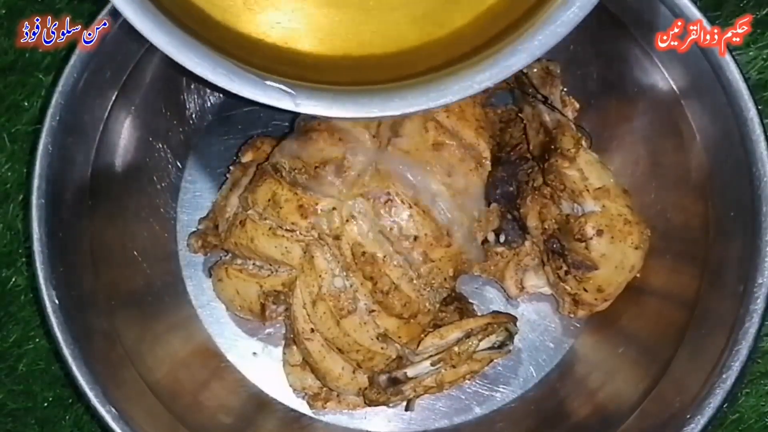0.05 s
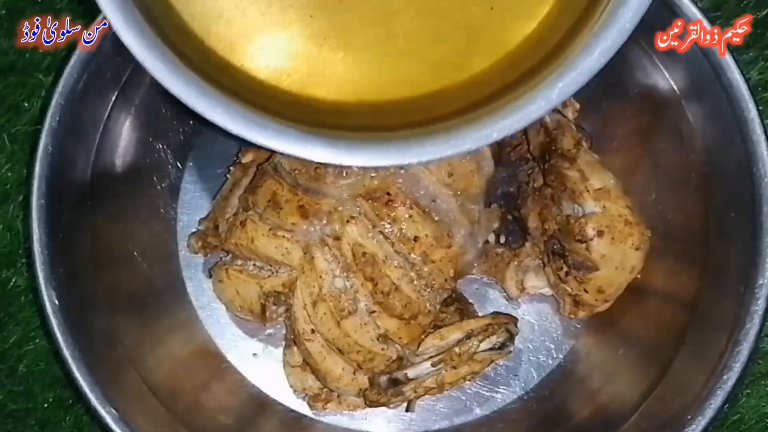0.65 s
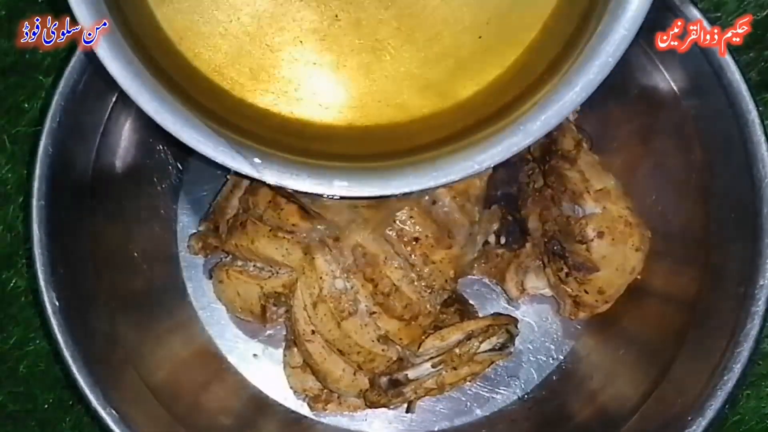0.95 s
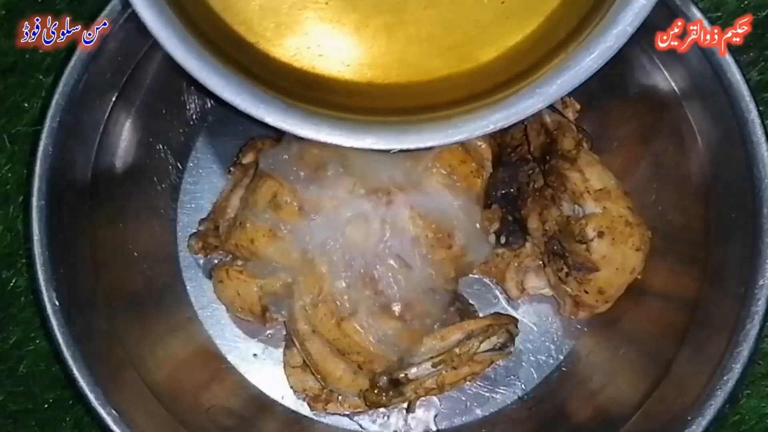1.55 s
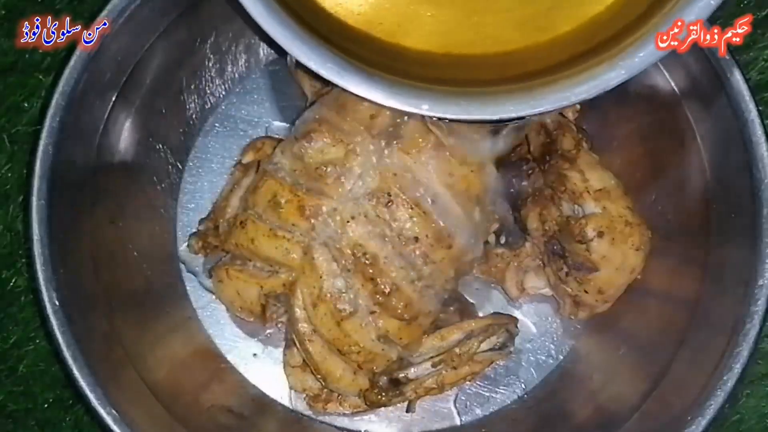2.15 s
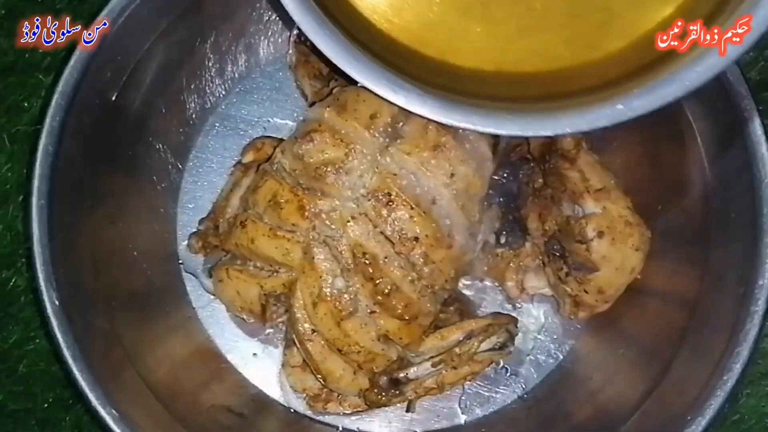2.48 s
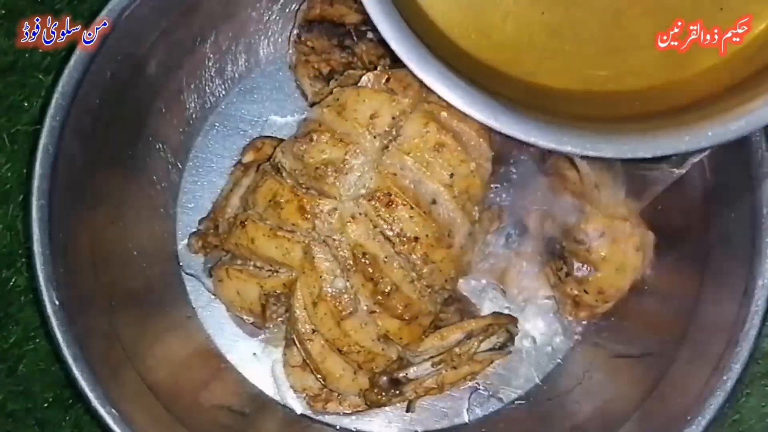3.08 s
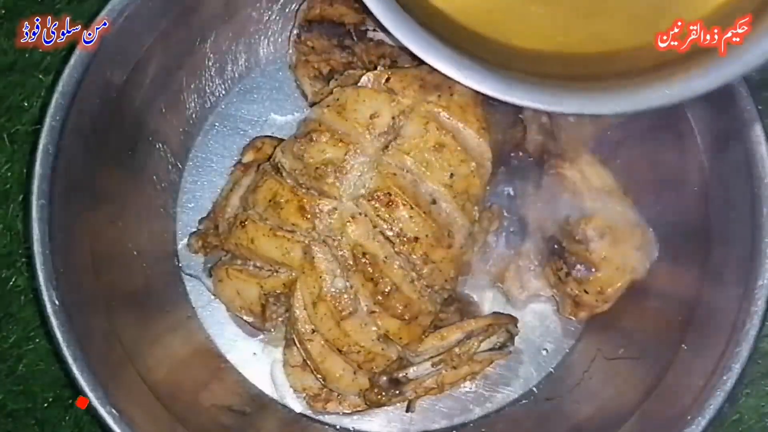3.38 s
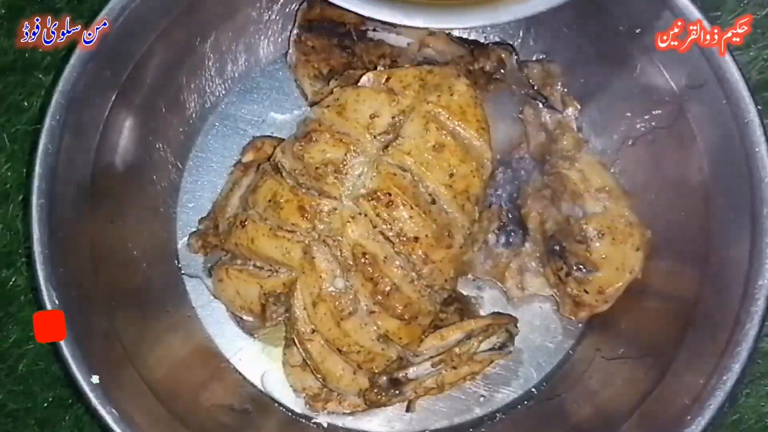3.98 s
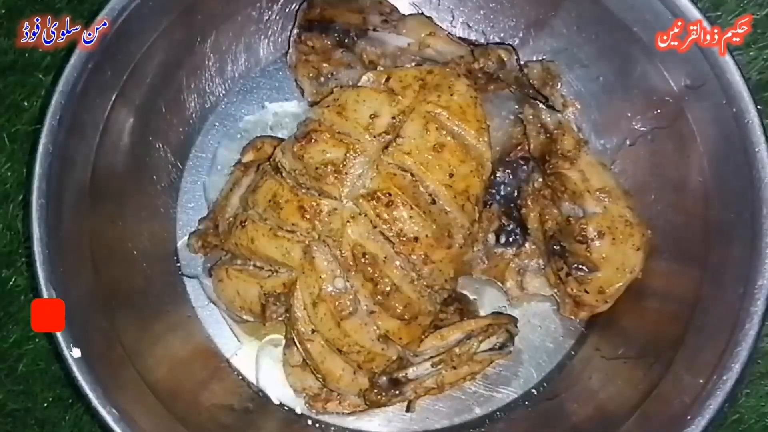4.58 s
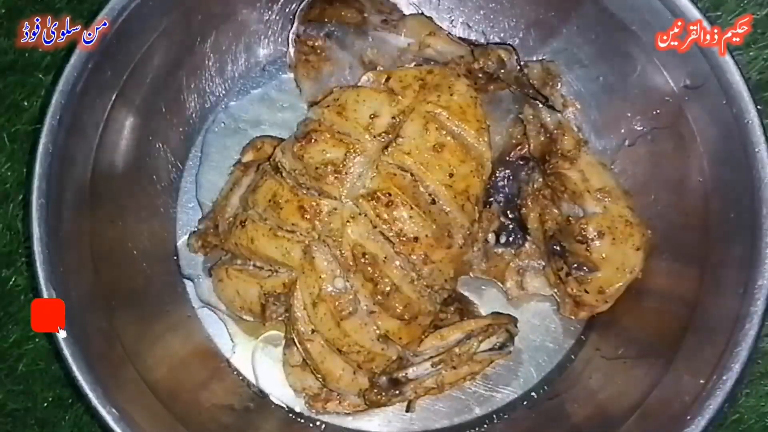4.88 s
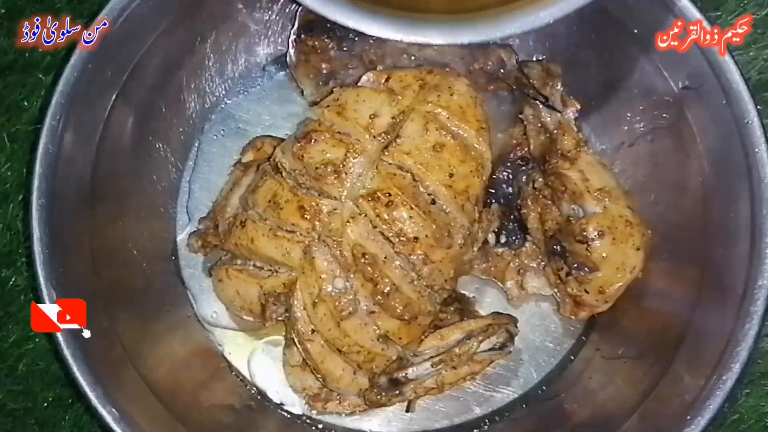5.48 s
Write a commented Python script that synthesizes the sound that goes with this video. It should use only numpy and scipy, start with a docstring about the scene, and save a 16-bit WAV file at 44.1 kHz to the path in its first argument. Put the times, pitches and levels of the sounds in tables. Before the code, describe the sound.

Hot oil sizzles and crackles as it is poured over chicken in a steel bowl, with sharp spits and a faint hum.

```python
"""In a kitchen, hot oil is poured over chicken in a steel bowl, close to a stereo microphone.
Water in the meat boils off as countless bubbles, each a damped oscillator, the larger the lower:
fine fizz, coarser crackle, a flare where oil meets wet skin, and a gurgle as the oil pools.
The bowl resonates and reflects the sizzle, and a faint hum wavers underneath.
Single drops of water spit loudly, and a few big bubbles plop."""
import sys
import numpy as np
from scipy import signal
from scipy.fft import rfft, irfft, next_fast_len
from scipy.io import wavfile
from scipy.ndimage import uniform_filter1d

SR = 44100
rng = np.random.default_rng(int(sys.argv[2]) if len(sys.argv) > 2 else 0)


def persist_wave(psi):
    """Save psi, clipped to +-1, as 16-bit WAV."""
    counts = np.round(np.clip(psi, -1, 1) * 32767).astype(np.int16)
    wavfile.write(sys.argv[1], SR, np.atleast_2d(counts).T)


N = 248283
T = np.arange(N) / SR

# Oil meets wet skin: start t/s, length/s, deep-bubble level/dB, crackle level/dB, ring f/Hz,
# ring level/dB, rate of round trips between the walls f/Hz, share kept per trip before treble loss
FLARES = [(-0.07, 0.24, -45, -39, 1545, -46.5, 770, 0.36), (1.161, 0.24, -39.5, -42, 1700, -43, 797, 0.34),
          (1.57, 0.36, -42, -50.5, 1020, -55.5, 830, 0.077), (3.04, 0.12, -45, -62, 2080, -50, 1080, 0.28),
          (3.996, 0.3, -54, -49, 970, -61, 1020, 0.14), (4.38, 0.3, -46, -42.5, 2190, -47.5, 1120, 0.069),
          (5.335, 0.34, -56, -70, 2404, -49, 1180, 0.13)]


def amp(db):
    """Amplitude ratio of a level: a factor of ten per 20 dB."""
    return 10 ** (np.asarray(db) / 20)


def unit_rms(x):
    """Normalisation: the mean of the two channels gets an rms of 1."""
    return x / np.sqrt(np.mean(x.mean(0) ** 2) + 1e-20)


def over_time(points):
    """Linear interpolation of a table in time."""
    return np.interp(T, *np.transpose(points))


def over_frequency(points, hz):
    """Linear interpolation of a table in log frequency."""
    f, level = np.transpose(points)
    return np.interp(np.log(hz + 1), np.log(f), level)


def pan(left_db):
    """Constant-power panning: two gains from a left-minus-right level difference."""
    pair = amp(np.array([left_db, -left_db]) / 2)
    return pair / np.sqrt(np.mean(pair ** 2, axis=0))


def colour(x, spectrum):
    """Filters in series multiply: source spectrum, bowl resonances, the microphone's unequal sides."""
    air_modes = [(2444, 24, 5), (3387, 31, 5.5), (4695, 120, 2.5)]  # air in the bowl: f/Hz, bandwidth/Hz, lift/dB
    balance = [(30, 6), (100, 2), (450, 5), (700, 5), (1000, 4.5), (1800, 5), (2400, 4), (4400, 6.5),
               (5200, 3.5), (6000, -6), (7000, -18), (7700, -11), (10000, -6), (15000, -8)]  # f/Hz, left-minus-right level/dB
    length = x.shape[1]
    size = next_fast_len(length + SR // 10)
    hz = np.fft.rfftfreq(size, 1 / SR)
    bowl = 1 + sum((amp(db) - 1) / (1 + 2j * (hz - f) / width) for f, width, db in air_modes)
    gain = pan(over_frequency(balance, hz)) * amp(over_frequency(spectrum, hz)) * bowl
    return irfft(rfft(x, size) * gain, size)[:, :length]


def voiced(x, spectrum, envelope):
    """Spectral and envelope shaping: the running rms of a filtered swarm follows the envelope."""
    x = colour(x, spectrum)
    power = abs(uniform_filter1d(x.mean(0) ** 2, size=3500))
    return envelope * x / np.sqrt(power + 1e-20)


def bubbles(per_s, low_hz, high_hz, cycles, spread_db, samples):
    """Damped oscillators start at Poisson-distributed times; each falls to 1/e in `cycles` periods."""
    chance, pitch, strength, place, path = rng.random((5, N))
    onsets = np.flatnonzero(chance < per_s / SR)
    hz = (low_hz + (high_hz - low_hz) * pitch)[onsets, None]
    level_db = spread_db * np.minimum(-np.log(strength[onsets, None]), 4.2)
    periods = hz * np.arange(samples) / SR
    ring = amp(level_db) * np.sqrt(hz) * np.exp(-periods / cycles) * np.sin(2 * np.pi * periods)
    right_lag = np.round(16 * (path[onsets] - .5)).astype(int)  # each side has its own path
    out = np.zeros((2, N))
    for channel, lag, gain in zip(out, (0, right_lag), pan(10 * (place[onsets] - .5))):
        indices = np.maximum(onsets + lag, 0)[:, None] + np.arange(samples)
        channel += np.bincount(indices.ravel(), (ring * gain[:, None]).ravel(), N)[:N]
    return unit_rms(signal.sosfilt(signal.butter(2, 300, "high", fs=SR, output="sos"), out))


def boiling(level_db, slope, pooled_db):
    """Power law: amplitude follows the boiling at `slope` dB per dB, shifting by pooled_db overall."""
    vigour = [(0, -25.5), (0.3, -26), (0.46, -30.5), (0.8, -33), (1.03, -35.5), (1.095, -38.5),
              (1.18, -30.5), (1.35, -26.5), (1.56, -28.8), (1.78, -26.5), (2.05, -33), (2.39, -34.5),
              (2.46, -28), (2.76, -32.5), (2.83, -36), (2.97, -35), (3.04, -27), (3.19, -29), (3.25, -31.5),
              (3.35, -29), (3.88, -34.5), (4.02, -27), (4.3, -34.5), (4.43, -29.5), (4.86, -32.5),
              (5.15, -31.5), (5.3, -42), (5.38, -29.5), (5.63, -32.5)]  # how hard the water boils under the stream: t/s, level/dB
    boil_db = over_time(vigour)
    return amp(level_db + slope * (boil_db - boil_db.mean()) + pooled_db * T / T[-1])


def showers(per_s=60, decay_s=0.002):
    """Cascade: a bursting bubble sets off its neighbours, so the power jumps and quickly decays."""
    chance, size = rng.random((2, N))
    kicks = (chance < per_s / SR) * np.minimum(-np.log(size), 2) ** 2
    extra_power = signal.lfilter([1], [1, -np.exp(-1 / (SR * decay_s))], kicks)
    return np.sqrt(1 + amp(7) * extra_power)


def fizz(snaps):
    """Bubble resonance rises as the radius shrinks: the two smallest sizes supply the treble."""
    spray_spectrum = [(7000, -2), (8300, 1.5), (9200, -1.5), (10000, 1), (10900, -3.5), (14000, -5),
                      (14900, 3), (15500, -13)]  # finest bubbles: f/Hz, level/dB
    fizz_spectrum = [(3000, -41), (4100, -7), (4700, -2.5), (5250, 1.5), (6100, -1.5), (6600, 1),
                     (7000, 4.5), (7350, 0.5), (7800, -7.5), (8600, -15), (11000, -30)]  # small bubbles: f/Hz, level/dB
    finest = bubbles(per_s=6000, low_hz=7760, high_hz=15700, cycles=5.3, spread_db=4, samples=64)
    small = bubbles(per_s=4000, low_hz=3824, high_hz=8800, cycles=6.6, spread_db=3, samples=140)
    small = small * showers() + amp(-9) * snaps
    spray = voiced(finest + amp(-29) * snaps, spray_spectrum, boiling(-44.5, slope=0.83, pooled_db=-3.5))
    return spray + voiced(small, fizz_spectrum, boiling(-38, slope=0.95, pooled_db=-0.3))


def swell(start, length, rise_s=0.073, fall_s=0.087):
    """Envelope of a flare: linear rise, hold and exponential decay."""
    return np.clip((T - start) / rise_s, 0, 1) * np.exp(-np.maximum(T - start - length, 0) / fall_s)


def crackle(snaps, flare_lag_s=0.047):
    """Middle-sized bubbles oscillate freely; more of them spatter just after each flare begins."""
    spectrum = [(1550, -55), (2000, -2), (2350, -2), (2750, 4.5), (3200, 4.5), (3800, -0.5), (4400, -4.5),
                (5500, -9)]  # middle-sized bubbles: f/Hz, level/dB
    lowest_hz = np.linspace(2600, 1600, N)  # bubbles grow larger as the oil pools
    swarm = bubbles(per_s=1800, low_hz=lowest_hz, high_hz=5085, cycles=4.3, spread_db=1.5, samples=200)
    steady = voiced(swarm * showers() + amp(3) * snaps, spectrum, boiling(-47, slope=0.92, pooled_db=3.5))
    spatter = bubbles(per_s=600, low_hz=2040, high_hz=5070, cycles=5.6, spread_db=4, samples=300)
    flaring = sum(amp(db) * swell(start + flare_lag_s, length) for start, length, _, db, *_ in FLARES)
    return steady + voiced(spatter * showers(), spectrum, flaring)


def flares(snaps):
    """Incoherent sources add in power: large bubbles on wet skin join those of the steady boil."""
    spectrum = [(750, -56), (970, -8), (1200, -26), (1450, -8), (1670, -2), (1900, -1.5), (2420, -5.5),
                (2750, -4)]  # large bubbles: f/Hz, level/dB
    swarm = bubbles(per_s=800, low_hz=920, high_hz=2640, cycles=9.5, spread_db=-1.5, samples=400)
    flaring = sum(amp(db) * swell(start, length) for start, length, db, *_ in FLARES)
    envelope = np.hypot(boiling(-48.5, slope=0.21, pooled_db=-2.5), flaring)
    return voiced(swarm * showers() + amp(-1.5) * snaps, spectrum, envelope)


def gurgle(snaps):
    """Heavy damping: the largest bubbles ring low in the pooled oil for only a few cycles."""
    spectrum = [(400, -31), (620, -8), (790, -6.5), (950, 3.5), (1110, -2.5), (1250, -6), (1650, -32)]  # bubbles in the pool: f/Hz, level/dB
    activity = [(0.0, -66), (1.15, -51), (1.24, -55), (1.55, -57), (1.74, -53), (2.22, -53), (3.36, -52.5),
                (3.89, -51), (4.09, -42), (4.42, -52.5), (4.53, -38.5), (4.81, -48), (5.3, -52),
                (5.63, -42.5)]  # gurgling: t/s, relative level/dB
    swarm = bubbles(per_s=400, low_hz=506, high_hz=1468, cycles=3, spread_db=2.5, samples=600)
    envelope = amp(over_time(activity)) * boiling(-5, slope=0.42, pooled_db=3.5)
    return voiced(swarm + amp(8.5) * snaps, spectrum, envelope)


def slosh(snaps):
    """Oil splashing into the pool excites low bubble resonances."""
    spectrum = [(400, -18), (640, 2), (800, 1), (1000, -3), (1200, 1), (1380, 9), (1600, -21)]  # splashes: f/Hz, level/dB
    inflow = [(0, -56), (2.2, -57.5), (2.9, -54), (3.35, -48), (3.9, -57), (4.55, -53), (4.85, -59),
              (5.63, -69)]  # how much oil splashes in: t/s, level/dB
    swarm = bubbles(per_s=390, low_hz=500, high_hz=1523, cycles=5.3, spread_db=5.5, samples=600)
    return voiced(swarm + amp(2.5) * snaps, spectrum, amp(over_time(inflow)))


def sputter(depth_db, per_s):
    """Random amplitude modulation: bubbles come in clumps."""
    knots = rng.standard_normal(N // 20)
    return amp(depth_db * np.interp(T * per_s, np.arange(len(knots)), knots))


def echoes(x, bowl_db, room_db, spots, bowl_t60=0.21, room_t60=0.4):
    """Reverberation of steel walls and kitchen: each spot in the bowl has its own impulse response."""
    t = np.arange(SR // 4) / SR
    bowl, room = [amp(-60 * t / t60) * (t > .0007) for t60 in (bowl_t60, room_t60)]
    decay = np.hypot(amp(bowl_db) * bowl / np.linalg.norm(bowl), amp(room_db) * room / np.linalg.norm(room))
    hops = np.arange(0, N, SR // 200)
    active_spot = rng.integers(0, spots, len(hops))
    out = np.zeros((2, N))
    for spot in range(spots):
        share = np.sin(np.pi / 2 * np.interp(np.arange(N), hops, active_spot == spot))
        response = decay * rng.standard_normal((2, len(t)))
        out += signal.fftconvolve(x * share, response, axes=1)[:, :N]
    return out


def flutter(x, dull_hz=9000):
    """Flutter echo: in a flare, round trips between the walls form a comb filter of unit power gain."""
    size = next_fast_len(N + SR // 10)
    hz = np.fft.rfftfreq(size, 1 / SR)
    spectrum = rfft(x, size)
    out = x.copy()
    for start, length, *_, trip_hz, share in FLARES:
        kept = share * np.exp(-hz / dull_hz)
        comb = np.sqrt(1 - kept ** 2) / (1 - kept * np.exp(-2j * np.pi * hz / trip_hz))
        out += swell(start, length) * (irfft(spectrum * comb, size)[:, :N] - x)
    return out


def resonate(x, hz, width_hz):
    """A resonator with unit gain at its centre frequency, which may move."""
    carrier = np.exp(2j * np.pi * np.cumsum(hz * np.ones(N)) / SR)
    pole = np.exp(-np.pi * width_hz / SR)
    return 2 * (carrier * signal.lfilter([1 - pole], [1, -pole], x / carrier)).real


def bowl_rings(shared_hz=2310, width_hz=155):
    """Cavity resonance: each flare rings the air in the bowl at its own pitch and at a shared one."""
    bursts = bubbles(per_s=700, low_hz=1270, high_hz=2640, cycles=0.3, spread_db=4, samples=100)
    bursts *= showers()

    def ring(hz):
        return unit_rms(resonate(resonate(bursts, hz, width_hz), hz, width_hz))

    shared = amp(1.5) * ring(shared_hz)
    out = np.zeros((2, N))
    for start, length, _, _, hz, db, *_ in FLARES:
        out += amp(db) * swell(start, length) * (ring(hz) + shared)
    return out * pan(11)[:, None]


def hollow(x, depth=0.52):
    """Destructive interference: reflections off the pouring pan weaken one band, which drifts as the pan moves."""
    notch = [(0.15, 1840), (0.45, 2120), (0.9, 1950), (1.35, 1890), (2.4, 1700), (3.2, 1560), (5.63, 1810)]  # centre of the band: t/s, f/Hz
    return x - depth * resonate(x, over_time(notch), width_hz=220)


def sizzle():
    """Superposition of all bubble sizes; the fine ones follow the stream as it wanders over the meat."""
    landing = [(0.0, -3.5), (0.28, 2.5), (2.71, -4.5), (3.51, -2), (3.67, -5), (5.55, -3), (5.63, -9)]  # where the stream lands: t/s, left-minus-right level/dB
    # bubble skins snap with a click that is heard in every band at once
    snaps = bubbles(per_s=900, low_hz=2900, high_hz=9850, cycles=0.21, spread_db=3.5, samples=32)
    stream_db = over_time(landing)
    flaring = sum(swell(start, length) for start, length, *_ in FLARES)
    left_db = stream_db - stream_db.mean() + 2.7 * (flaring - flaring.mean())  # flares lie to the left
    clumps = sputter(depth_db=0.94, per_s=190) * sputter(depth_db=1.25, per_s=24)
    fine = (fizz(snaps) + crackle(snaps)) * clumps * pan(left_db)
    coarse = (flares(snaps) + gurgle(snaps) + slosh(snaps)) * clumps / np.sqrt(2)
    reflected = echoes(fine + amp(1.5) * coarse, bowl_db=-4.5, room_db=-3.5, spots=14)
    return hollow(flutter(fine + coarse + reflected) + bowl_rings())


def wavering(hz, width_hz):
    """Narrow-band noise: a tone whose amplitude and phase wander at random."""
    lowpass = signal.butter(1, width_hz / 2, fs=SR, output="sos")
    slow = signal.sosfilt(np.vstack([lowpass, lowpass]), rng.standard_normal((2, N + SR)))[:, SR:]
    phasor = slow[0] + 1j * slow[1]
    tone = (np.exp(2j * np.pi * hz * T) * phasor / abs(phasor) ** 0.44).real
    return unit_rms(tone * pan(5)[:, None])


def room_noise(spectrum, apart_db):
    """Partial coherence: noise common to both sides plus a weaker independent part on each."""
    noise = rng.standard_normal((3, N))
    return unit_rms(colour(noise[0] + amp(apart_db) * noise[1:], spectrum))


def hum():
    """Common modulation: the kitchen's air noise swells with a faint wavering hum and a low rumble."""
    hum_levels = [(0, -64), (0.11, -62), (0.64, -64), (0.86, -50.5), (0.95, -58), (1.47, -65), (2.24, -63),
                  (2.5, -69), (3.9, -68), (4.0, -61), (4.55, -58), (4.64, -50), (4.88, -56), (5.04, -51.5),
                  (5.3, -58), (5.63, -54)]  # highest tone: t/s, relative level/dB
    rumble_levels = [(0, -63.0), (0.25, -62.5), (0.85, -57.5), (1.0, -51), (1.22, -62), (2.2, -61),
                     (2.55, -64), (2.8, -60.5), (4.8, -65), (5.05, -58.0), (5.3, -64.5), (5.63, -62)]  # rumble and two lower tones: t/s, relative level/dB
    rumble_spectrum = [(15, -13), (49, 3.5), (58, -11), (80, 4), (135, 6.5), (230, -4), (500, -50)]  # low rumble: f/Hz, level/dB
    air_spectrum = [(60, -25), (150, 1), (200, 6), (235, -6.5), (268, 4.5), (298, -2), (337, 6), (385, -1),
                    (412, 5.5), (500, -4.5), (660, -3.5), (1200, -48), (4000, -22)]  # kitchen air: f/Hz, level/dB
    hum_db, rumble_db = over_time(hum_levels), over_time(rumble_levels)
    high_tone = wavering(hz=184.3, width_hz=9) * amp(hum_db + 0.5)
    low_tones = wavering(hz=113, width_hz=8.9) + amp(-4.5) * wavering(hz=72.5, width_hz=12)
    rumble = room_noise(rumble_spectrum, apart_db=-9) * amp(rumble_db - 0.5)
    stir_db = 0.17 * (hum_db - hum_db.mean()) + 0.34 * (rumble_db - rumble_db.mean())
    air = room_noise(air_spectrum, apart_db=-4.5) * amp(stir_db - 54.5)
    return high_tone + low_tones * amp(rumble_db - 3.5) + rumble + air


def spits(onset_samples=100, pop_s=0.0016):
    """Impulsive excitation: a water drop bursts with a crack, a short ring and a low pop of oil."""
    # t/s, level/dB, ring f/Hz, ring decay time/s, pop level/dB, left-minus-right level/dB
    drops = [(0.034, -25.5, 4700, 0.008, -24.5, 0), (0.060, -25.5, 3300, 0.006, -28, 2),
             (0.087, -24, 3100, 0.004, -30, 3), (0.123, -23, 2440, 0.006, -27, 4),
             (0.131, -20, 4490, 0.0055, -24, 2), (0.219, -24, 6910, 0.003, -43, -5),
             (0.356, -27.5, 1620, 0.006, -32, 4.5), (0.358, -21.5, 5100, 0.005, -31, 3),
             (1.127, -36, 2300, 0.004, -35.5, 0), (1.330, -24, 7200, 0.002, -30, 0),
             (1.453, -23, 2500, 0.002, -30, 3), (1.920, -29, 2050, 0.004, -34, 0),
             (2.7995, -21, 6900, 0.0012, -36, -9), (2.9475, -23, 7170, 0.002, -31, -6),
             (3.141, -25, 1950, 0.004, -26, 0), (3.204, -18.5, 6860, 0.0015, -29, -5),
             (3.492, -17.5, 5500, 0.002, -22, -1), (3.672, -27, 7000, 0.0005, -41, -7),
             (3.913, -21.3, 6970, 0.001, -36, -6.5), (4.463, -24.5, 6600, 0.0016, -30, -5),
             (4.591, -23, 3300, 0.002, -29, 6), (4.6895, -22, 2750, 0.0018, -27, 9),
             (5.142, -27.5, 4500, 0.0015, -33, 1), (5.233, -20.7, 6820, 0.0014, -26.5, -6),
             (5.260, -27, 6760, 0.001, -37, -7)]
    crack_spectrum = [(300, -18), (900, -18), (2800, -4), (4200, -0.5), (5400, 8), (7000, 12.5),
                      (8500, -4.5), (15000, -22)]  # bursting drop: f/Hz, level/dB
    pop_spectrum = [(400, -14), (700, -6), (950, 3), (1300, -7), (1700, -15), (2400, 2), (3300, 3),
                    (4100, -8), (7000, -24)]  # pop of oil: f/Hz, level/dB
    t = np.maximum(np.arange(-onset_samples, SR // 50), 0) / SR
    rise = 1 - np.exp(-t / .0001)
    out = np.zeros((2, N + len(t)))
    for at_s, db, hz, ring_s, pop_db, left_db in drops:
        crack = colour(rng.standard_normal((2, len(t))) * rise * np.exp(-2 * t / ring_s), crack_spectrum)
        band = signal.butter(2, [hz / 2, hz * 2], "band", fs=SR)  # small drops crack thinner
        crack = signal.lfilter(*band, crack)
        phase = rng.uniform(0, np.pi / 2, (2, 1))  # the ring reaches each side by its own path
        ring = np.sin(2 * np.pi * hz * t + phase) * rise * np.exp(-t / ring_s)
        burst = crack / np.linalg.norm(crack) + amp(-3) * ring / np.linalg.norm(ring)
        burst /= np.sqrt(np.mean(burst[:, onset_samples:2 * onset_samples] ** 2, axis=1, keepdims=True))
        floor_hz = np.interp(at_s, [0, T[-1] / 2], [1700, 560])  # pops deepen as the oil pools
        pop = colour(rng.standard_normal((1, len(t))) * rise * np.exp(-t / pop_s), pop_spectrum)[0]
        pop = signal.lfilter(*signal.butter(4, floor_hz, "high", fs=SR), pop)
        pop *= amp(pop_db) * np.sqrt(onset_samples / np.sum(pop ** 2))
        start = round(at_s * SR) - onset_samples
        out[:, start:start + len(t)] += amp(db) * burst * pan(left_db)[:, None] + pop * pan(9)[:, None]
    direct = out[:, :N]
    return direct + echoes(direct, bowl_db=-14.5, room_db=-29, spots=4)


def plops(decay_s=0.004):
    """Damped free oscillation: a big bubble surfaces in the pool and rings briefly."""
    big_bubbles = [(1.247, -33, 980), (3.492, -31, 790), (4.108, -24, 970), (4.298, -28, 920),
                   (5.568, -32, 945)]  # t/s, level/dB, f/Hz
    out = np.zeros(N)
    for at_s, db, hz in big_bubbles:
        t = np.maximum(T - at_s, 0)
        out += amp(db) * np.sin(2 * np.pi * hz * t) * (1 - np.exp(-t * hz)) * np.exp(-t / decay_s)
    return out * pan(11)[:, None]


def scene():
    """Superposition: the sound pressures from the bowl and the kitchen add."""
    return sizzle() + hum() + spits() + plops()


def record(dry, edge_hz=15800):
    """Band limiting: a linear-phase low-pass filter removes the highest treble."""
    lowpass = signal.firwin(511, edge_hz, window=("kaiser", 9), fs=SR)
    return signal.oaconvolve(dry, lowpass[None], "same")


dry = scene()
out = record(dry)
persist_wave(out)
```